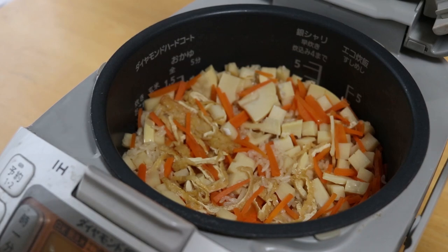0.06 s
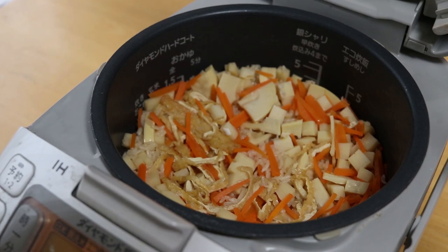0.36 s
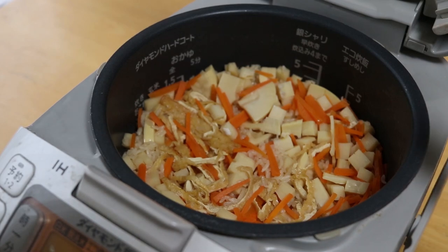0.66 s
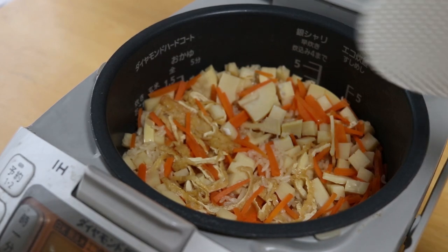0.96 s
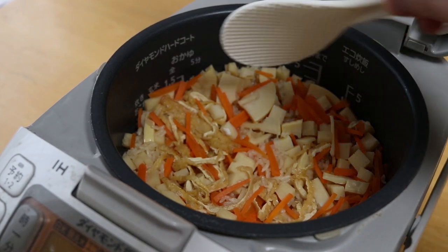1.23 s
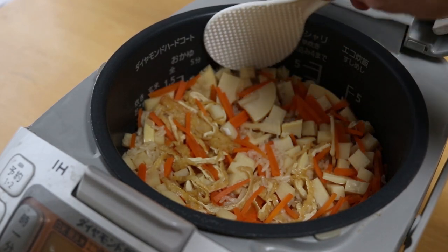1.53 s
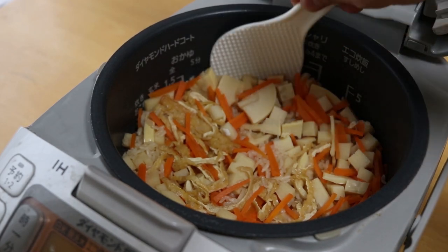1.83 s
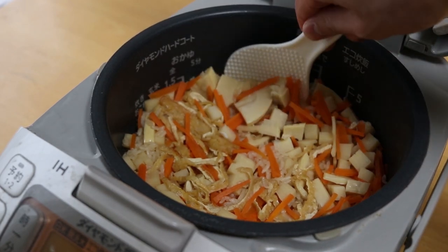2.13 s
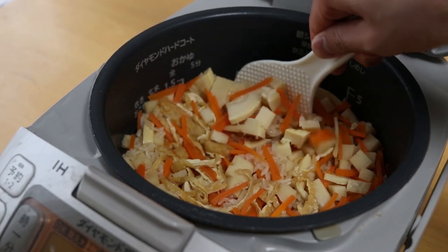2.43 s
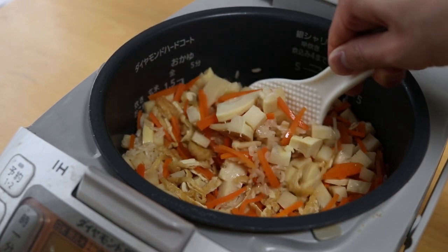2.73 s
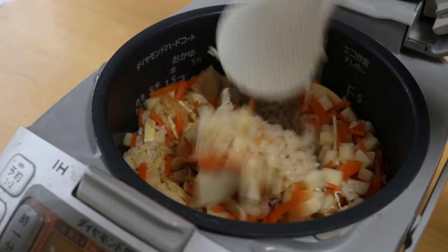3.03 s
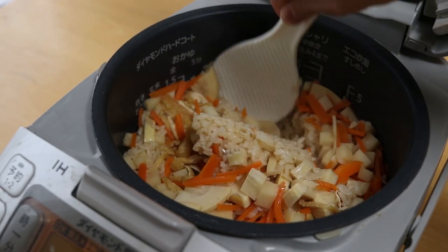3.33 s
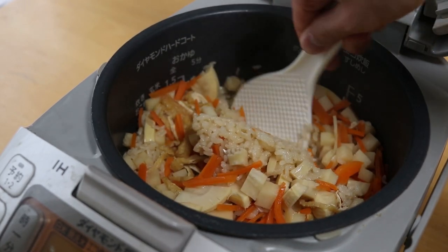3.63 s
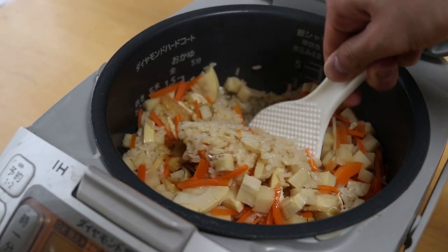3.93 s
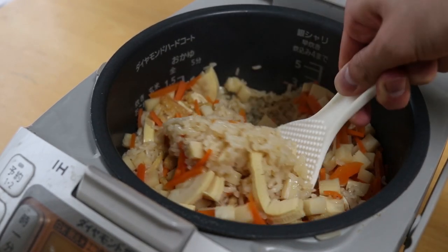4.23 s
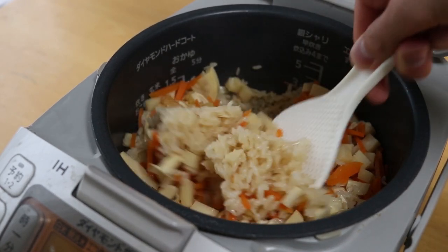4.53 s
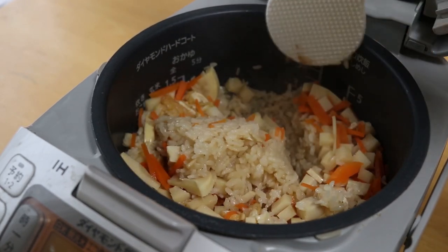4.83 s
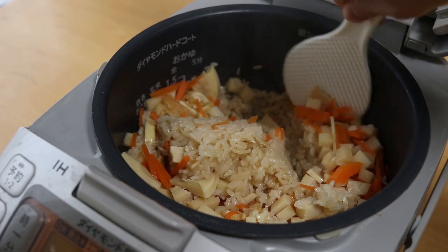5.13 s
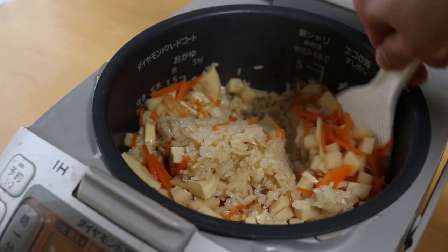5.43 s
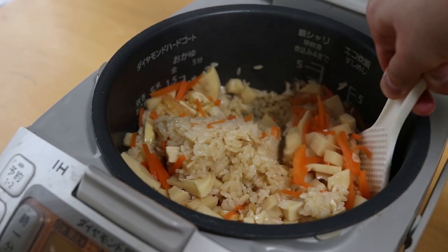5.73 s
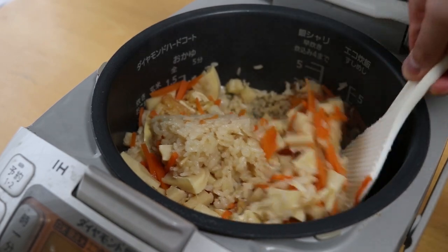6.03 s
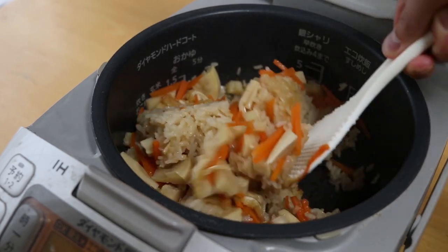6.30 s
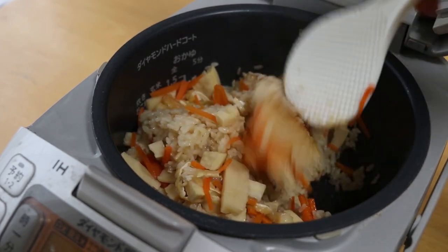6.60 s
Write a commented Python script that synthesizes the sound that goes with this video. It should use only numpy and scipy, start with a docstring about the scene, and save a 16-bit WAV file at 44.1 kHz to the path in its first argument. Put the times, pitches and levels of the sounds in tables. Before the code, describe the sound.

Moist rice squelches and crackles as a plastic paddle taps and scrapes a nonstick pot, which knocks in its housing in a quiet kitchen.

```python
"""A quiet kitchen, two microphones close to a rice cooker. At first there is room tone, a low drone
and one faint knock. From 1.6 s a plastic paddle stirs cooked rice and vegetables: it clacks and scrapes
on the nonstick pot, and between blows the sticky rice squelches and crackles. At 2.5 s and 3 s the pot
knocks hard in its housing, and with the second knock a scoopful tumbles back. The stirring goes on
through another hard knock at 5.5 s and a small tumble at 6.5 s, then ends on a soft push."""
import sys
import numpy as np
from scipy import signal
from scipy.fft import rfft, irfft, next_fast_len
from scipy.io import wavfile

SR = 44100
rng = np.random.default_rng(int(sys.argv[2]) if len(sys.argv) > 2 else 0)


def persist_wave(psi):
    """Save psi, clipped to +-1, as 16-bit WAV."""
    counts = np.round(np.clip(psi, -1, 1) * 32767).astype(np.int16)
    wavfile.write(sys.argv[1], SR, np.atleast_2d(counts).T)


N = 302513
TIME = np.arange(N) / SR
AGE = np.arange(SR // 2) / SR  # seconds since a blow


def amp(db):
    """Decibels to gain."""
    return 10 ** (np.asarray(db) / 20)


def unit(x):
    """Scales to rms 1."""
    return x / np.sqrt(np.mean(x ** 2) + 1e-20)


def unit_hit(x):
    """Scales a short sound to the energy of 10 ms at rms 1."""
    return x * np.sqrt(SR / 100 / (np.sum(x ** 2) + 1e-20))


def value_at(points, hz):
    """A curve's value at hz, on a log-frequency axis."""
    freqs, values = np.transpose(points)
    return np.interp(np.log(hz + 1), np.log(freqs + 1), values)


def add(mix, start_s, sound):
    """Mixes a sound in at start_s."""
    part = mix[max(round(start_s * SR), 0):][:len(sound)]
    part += sound[:len(part)]


def colour(x, spectrum):
    """Filters by a spectrum in dB."""
    size = next_fast_len(len(x))
    gain = amp(value_at(spectrum, np.fft.rfftfreq(size, 1 / SR)))
    return irfft(rfft(x, size) * gain, size)[:len(x)]


def band(x, lo_hz, hi_hz, order=2):
    """Causal band-pass."""
    edges_hz = [lo_hz, min(hi_hz, SR / 2 - 1000)]
    return signal.sosfilt(signal.butter(order, edges_hz, "band", fs=SR, output="sos"), x)


def ring(modes):
    """Dying sines; each blow lands elsewhere and weights them a little differently."""
    out = np.zeros(SR // 4)
    for hz, db, t60 in modes:
        t = AGE[:int(t60 * SR)]
        add(out, 0, amp(db + rng.standard_normal() - 60 * t / t60) * np.sin(2 * np.pi * hz * t))
    return unit_hit(out)


def crack(lo_hz, hi_hz, t60, after_db, after_t60):
    """Crowded, well damped modes: a sharp burst and a weaker after-ring."""
    t = AGE[:SR // 10]
    decay = amp(-60 * t / t60) + amp(after_db - 60 * t / after_t60)
    return unit_hit(band(rng.choice([-1., 1.], len(t)) * decay, lo_hz, hi_hz, order=3))


def grains(per_s, spread_db, size):
    """Random clicks, mostly small and a few large."""
    strength = amp(spread_db * np.minimum(rng.exponential(1, size), 4))
    sign = rng.choice([-1., 1.], size)
    return strength * sign * (rng.random(size) < per_s / SR)


def gesture(start_s, length_s, rise_s, release_s):
    """An envelope that rises, holds, then dies away."""
    rise = np.clip((TIME - start_s) / rise_s, 0, 1)
    return rise * np.exp(-np.maximum(TIME - start_s - length_s, 0) / release_s)


# each microphone's own noise: freq_hz, level_db
HISS_SPECTRUM = [(24, -34), (40, -2), (136, -6), (722, -6.5), (3470, -7), (12400, -2), (15500, -4)]
def microphone_hiss(level_db=-60.5):
    """Steady self-noise of one microphone."""
    return amp(level_db) * unit(colour(rng.standard_normal(N), HISS_SPECTRUM))


# the still kitchen: freq_hz, level_db
ROOM_TONE_SPECTRUM = [(12, -48), (20, -4.5), (70, 2), (106, -5.5), (145, -1), (202, -8), (226, -0.5),
                      (373, -12), (417, -6.5), (454, -18), (507, -13.5), (551, -18.5), (886, -17.5),
                      (2220, -25.5), (5000, -29), (15600, -36.5)]
# a low drone that swells and fades: time_s, level_db
DRONE_LEVELS = [(0, -63), (.4, -67), (.51, -49), (.69, -57), (.78, -51), (.89, -56), (.98, -49),
                (1.12, -69), (1.6, -66)]
def room_tone(level_db=-54):
    """Steady noise of the kitchen, with a low drone that wavers early on."""
    drone_db = np.interp(TIME, *np.transpose(DRONE_LEVELS))
    drone = amp(drone_db) * unit(band(rng.standard_normal(N), 59.5, 71))
    return amp(level_db) * unit(colour(rng.standard_normal(N), ROOM_TONE_SPECTRUM)) + drone


# decay of the kitchen's echoes: freq_hz, t60_s
ECHO_DECAY = [(100, 0.85), (260, 0.37), (700, 0.52), (1840, 0.47), (4850, 0.49), (14000, 0.085)]
# tone of those echoes at the microphones: freq_hz, level_db
ECHO_SPECTRUM = [(60, 2), (135, -3), (185, -10.5), (250, -2), (400, -11.5), (600, -11.5), (1000, -9),
                 (1400, -13.5), (2200, -15), (4000, -14.5), (6000, -17), (14000, -33.5)]
def kitchen_echoes(x, first_s=0.003):
    """Dense echoes off near walls, each band dying at its own speed."""
    echoes = grains(4000, 0.51, len(AGE)) * np.clip((AGE - first_s) / 0.0023, 0, 1)
    hz, t, bands = signal.stft(echoes, SR, nperseg=256)
    decay = amp(-60 * t / value_at(ECHO_DECAY, hz)[:, None])
    tail = signal.istft(bands * decay, SR, nperseg=256)[1]
    return signal.oaconvolve(x, colour(tail / np.linalg.norm(tail), ECHO_SPECTRUM))[:N]


# slow low resonances of cooker, table and room: pitch_hz, gain_db, width_hz
BOOM_MODES = [(76, -3, 34), (138, 6, 14), (240, 2, 15), (490, -5, 20)]
def boom(x, delay_s=0.00754):
    """Low resonances that swell after each blow and outlast it."""
    out = np.zeros(N)
    for hz, db, width_hz in BOOM_MODES:
        swell = AGE * np.exp(-np.pi * width_hz * AGE)
        response = 2 * swell / swell.sum() * np.sin(2 * np.pi * hz * AGE)
        add(out, delay_s, amp(db) * signal.oaconvolve(x, response))
    return out


# a low hum standing between table and walls: pitch_hz, level_db, t60_s
STANDING_WAVE_MODES = [(270, 0, .11), (345, -8, .08), (398, -8, .07), (475, -9, .1)]
def standing_wave_hum(rise_s=.02):
    """A low hum between table and walls takes a few cycles to build after a blow, then dies quickly."""
    out = np.zeros(N)
    swell = 1 - np.exp(-(AGE[:SR // 4] / rise_s) ** 2)
    for start_s, *_, hum_db in contacts():
        add(out, start_s, amp(hum_db) * unit_hit(ring(STANDING_WAVE_MODES) * swell))
    return out


def starch_pop(hz, t60=0.0009, rustle_share=0.73):
    """A starch film snapping: a click of a few cycles with a rustle around its pitch."""
    t = AGE[:SR // 50]
    snap = np.sin(2 * np.pi * hz * t) * amp(-60 * t / t60)
    rustle = band(rng.standard_normal(len(t)), hz / 2.6, hz * 2.5) * amp(-60 * t / 0.01)
    return unit_hit(unit_hit(snap) + rustle_share * unit_hit(rustle))


# low shove of the mass and its wet squelch, heard close: freq_hz, level_db
SHOVE_SPECTRUM = [(20, -5), (40, -23), (75, 3.5), (105, -9), (140, 1.5), (185, -10), (250, 4.5), (350, -8),
                  (490, -8), (750, -16.5), (1500, -15.5), (4000, -44)]
SQUELCH_SPECTRUM = [(200, 2), (600, 1), (1500, -6), (2300, -9), (3700, -2.5), (5000, -15), (7500, -16.5),
                    (15000, -18)]
# the paddle moves through the rice: start_s, length_s, shove_db, squelch_db, crackle_db
PADDLE_STROKES = [(1.603, 0.6, -53.5, -55.5, -59), (2.356, 0.55, -56.5, -50.5, -57),
                  (3.222, 0.19, -48, -74, -64), (3.516, 0.39, -48, -52, -61.5),
                  (4.067, 0.37, -56, -55, -60), (4.46, 0.36, -55, -74, -63),
                  (5.044, 0.12, -45.5, -53, -54.5), (5.261, 0.31, -44, -49, -53),
                  (6.08, 0.12, -47.5, -55, -55.5), (6.517, 0.18, -47, -61, -61)]
# large sticky grains letting go: start_s, level_db, pitch_hz
GRAIN_SNAPS = [(1.5548, -46.5, 4900), (1.738, -45, 6400), (2.1007, -49.5, 4170), (2.2016, -52, 5200),
               (2.6567, -44, 4150), (2.8866, -46, 11000), (4.0283, -46, 5240), (4.298, -45, 6400),
               (5.298, -43, 6200), (5.305, -45, 6400), (5.4534, -43, 5170)]
def sticky_rice(crackles_per_s=200):
    """With each stroke the paddle shoves the soft mass, which squelches while single grains unstick."""
    levels = np.zeros((3, N))
    for start_s, length_s, *layers_db in PADDLE_STROKES:
        stroke = gesture(start_s, length_s, rise_s=0.019, release_s=0.23)
        levels = np.maximum(levels, amp(layers_db)[:, None] * stroke)
    shove_gain, squelch_gain, crackle_gain = levels
    shove = shove_gain * unit(colour(grains(500, 2.6, N), SHOVE_SPECTRUM))
    squelch = squelch_gain * unit(colour(grains(3500, 6.1, N), SQUELCH_SPECTRUM))
    pitches_hz = np.geomspace(3000, 13000, 10)
    pops_per_s = crackles_per_s / len(pitches_hz)
    pops = sum(signal.oaconvolve(grains(pops_per_s, 4.1, N), starch_pop(hz))[:N] for hz in pitches_hz)
    crackle = crackle_gain * unit(pops)
    for start_s, db, hz in GRAIN_SNAPS:
        add(crackle, start_s, amp(db) * starch_pop(hz))
    return shove + squelch + crackle


# soft clumps landing: freq_hz, level_db
PATTER_SPECTRUM = [(25, -24), (45, -10), (75, -0.5), (105, -10), (138, 6), (185, 1.5), (235, 6.5),
                   (350, -4.5), (490, 2), (750, -14), (1200, -14), (2000, -23.5), (3700, -32.5),
                   (6000, -42), (15000, -50)]
# the whole cooker on its feet: pitch_hz, level_db, t60_s
THUMP_MODES = [(88, 0, 0.17), (131.6, 2.5, .12)]
# rice falls back into the pot: start_s, length_s, patter_db, thump_db
SCOOPFULS = [(2.94, .19, -25.5, -26), (6.495, 0.017, -31, -30.5)]
def tumbles(clumps_per_s=380, spread_db=1.5):
    """The mass lands with a low thump and soft clumps patter after it."""
    flow = sum(amp(patter_db) * gesture(start_s, length_s, rise_s=0.01, release_s=0.044)
               for start_s, length_s, patter_db, _ in SCOOPFULS)
    out = flow * unit(colour(grains(clumps_per_s, spread_db, N), PATTER_SPECTRUM))
    for start_s, _, _, thump_db in SCOOPFULS:
        add(out, start_s, amp(thump_db) * ring(THUMP_MODES))
    return out


# wall of the metal pot: pitch_hz, level_db, t60_s
POT_MODES = [(480, -6, .22), (600, -9, .13), (965, -1, .12), (1015, -5, .12), (1060, -2, .18),
             (1250, -16, .16), (1712, 0, .11), (1750, -8, .1), (2379, -5, .2), (2410, -8, .14),
             (2912, -11, .14), (3338, -5, .17), (3800, -9, .1), (3990, -14, .13), (4365, -9, .1),
             (4565, -17, .18), (5080, -19, .15), (5706, -19, .15), (6585, -9, .15), (6700, -12, .12),
             (7700, -18, .1), (8150, -21, .12), (9600, -23, .14), (13320, -25, .08)]
def pot_wall(hardness_db, favoured_hz, tilt=0.21, favour_db=6, favour_octaves=0.24):
    """The pot's ring: soft contacts lean to the low modes, and the place struck favours one pitch."""
    modes = []
    for hz, db, t60 in POT_MODES:
        tilt_db = tilt * hardness_db * np.log2(hz)
        place_db = favour_db * np.exp(-(np.log2(hz / favoured_hz) / favour_octaves) ** 2)
        modes.append((hz, db + tilt_db + place_db, t60))
    return ring(modes)


# rasp of the paddle's dimples: freq_hz, level_db
RASP_SPECTRUM = [(200, 6), (500, 17), (1150, -20), (1800, -0.5), (2700, 4), (3700, -1), (5200, -9.5),
                 (7000, -5.5), (11000, -12.5), (15000, -18)]
# the paddle drags on the pot: start_s, length_s, rasp_db, ring_db
PADDLE_DRAGS = [(1.578, 0.042, -39.5, -48), (1.859, 0.065, -55, -63), (2.917, 0.064, -36, -60),
                (3.231, 0.086, -39.5, -43.5), (3.615, 0.19, -48.5, -65), (5.042, 0.092, -41.5, -45.5),
                (5.107, 0.16, -52.5, -53), (5.529, 0.16, -49, -53)]
def scrapes(slips_per_s=2500):
    """Tiny slips of the dimpled paddle rasp and set the pot singing."""
    out = np.zeros(N)
    for start_s, length_s, rasp_db, ring_db in PADDLE_DRAGS:
        size = int(length_s * SR)
        slips = unit(grains(slips_per_s, 1.6, size)) * signal.windows.tukey(size, .5)
        metal = ring(POT_MODES)
        add(out, start_s, amp(rasp_db) * unit(colour(slips, RASP_SPECTRUM)))
        add(out, start_s, amp(ring_db) * signal.fftconvolve(slips, metal / np.linalg.norm(metal)))
    return out


# the paddle taps the bare wall:
# start_s, clack_db, thud_db, tick_db, tick_hz, ring_db, favoured_hz, hum_db
WALL_TAPS = [(1.5703, -18.5, -26.5, -20, 8700, -23, 1730, -34),
             (1.6302, -30.5, -33.5, -41.5, 6900, -29.5, 1750, -44),
             (2.272, -23.5, -30, -24, 5670, -31, 1750, -27.5),
             (3.228, -22.5, -26, -28, 7860, -25.5, 2380, -21.5),
             (4.911, -26, -22, -41.5, 6860, -23.5, 1060, -22)]
# the pot knocks against its housing: start_s, thud_db, thud_hz, clack_db, hardness_0_to_1
POT_KNOCKS = [(0.475, -41.5, 408, -54, .05), (2.5002, -19, 366, -20, .4), (2.508, -42, 580, -29.5, 0.75),
              (2.916, -27, 463, -26.5, 0.41), (2.935, -23, 285, -30, 0.1), (2.967, -18, 239, -34, 0.6),
              (2.978, -8.5, 495, -22.5, 1), (3.5112, -42, 920, -38, 0.5), (3.565, -23.5, 422, -40.5, 0.3),
              (3.937, -33, 504, -41.5, 0.3), (4.397, -36, 477, -51, 0.7), (5.513, -12.5, 510, -24, 0.75),
              (5.5182, -25.5, 310, -18.5, 0.5), (6.01, -19.5, 493, -46, 0.7),
              (6.499, -27.5, 332, -30.5, 0.38), (6.521, -18.5, 422, -32.5, 0)]
# pushes reach the pot through a cushion of rice: start_s, thud_db, thud_hz
CUSHIONED_PUSHES = [(2.115, -43, 312), (2.4936, -14, 490), (4.194, -44, 524), (4.473, -38.5, 307),
                    (5.1, -37.5, 435), (5.3279, -23.5, 528), (5.335, -23.5, 398), (6.1379, -30, 446),
                    (6.418, -37, 490), (6.826, -37.5, 426)]
def contacts(tap_thud_hz=421, deep_hz=980, hum_offset_db=-12, hum_growth=0.71):
    """Lists every tap, knock and push; blows deep in the pot favour the wall modes near deep_hz."""
    for start_s, clack_db, thud_db, tick_db, tick_hz, ring_db, favoured_hz, hum_db in WALL_TAPS:
        yield start_s, thud_db, tap_thud_hz, clack_db, tick_db, tick_hz, ring_db, favoured_hz, hum_db
    for start_s, thud_db, thud_hz, clack_db, hardness in POT_KNOCKS:
        tick_db = clack_db - 28.5 + 33 * hardness  # harder knocks tick louder and brighter
        tick_hz = np.interp(hardness, [0, 1], [5470, 9100])
        ring_db = clack_db - 12
        hum_db = hum_offset_db + hum_growth * thud_db
        yield start_s, thud_db, thud_hz, clack_db, tick_db, tick_hz, ring_db, deep_hz, hum_db
    for start_s, thud_db, thud_hz in CUSHIONED_PUSHES:
        clack_db, ring_db = thud_db - 24.5, thud_db - 18  # little passes the rice
        tick_db, tick_hz = thud_db - 47, 7500  # faint tick of grains
        hum_db = hum_offset_db + hum_growth * thud_db
        yield start_s, thud_db, thud_hz, clack_db, tick_db, tick_hz, ring_db, deep_hz, hum_db


# the loaded pot in its housing, the housing's panels, the plastic paddle: pitch_hz, level_db, t60_s
HOUSING_MODES = [(277.7, 8, 0.074), (354, 11, 0.05), (395, 3, 0.038), (605, 4, 0.062), (806.5, -2.5, 0.067)]
PANEL_MODES = [(811, -0.5, 0.023), (1041, -10, 0.053), (1285, 3, 0.01), (1600, -5.5, 0.007)]
PADDLE_MODES = [(2910, 4, 0.022), (3280, 11, 0.012), (3830, -1, 0.05), (4160, -10, 0.0048),
                (5010, -5, 0.0043)]
def blows(thud_t60=0.03, housing_share=0.61, panel_share=0.77, paddle_share=0.31, crack_share=0.78):
    """Close to the microphones, each blow thuds in the pot, cracks in the plastic and rings the wall."""
    out = np.zeros(N)
    cushion = 1 - np.exp(-AGE[:SR // 4] / 0.0012)  # rice softens the onset
    for start_s, thud_db, thud_hz, clack_db, tick_db, tick_hz, ring_db, favoured_hz, _ in contacts():
        panel_db = thud_db + 0.66 * (clack_db - thud_db) - 1  # panels follow clack more than thud
        body = ring([(thud_hz, 0, thud_t60)]) + housing_share * ring(HOUSING_MODES)
        thud = unit_hit(band(body * cushion, 164, 6000, order=1))  # a small pot radiates little bass
        panel_crack = crack_share * crack(810, 1854, t60=0.01, after_db=-7, after_t60=0.084)
        clack = crack_share * crack(2140, 4080, t60=0.0064, after_db=-12.5, after_t60=0.053)
        tick = crack(tick_hz / 1.45, tick_hz * 1.17, t60=0.012, after_db=-16, after_t60=0.032)
        # the housing panels are pushed the other way, so their ring starts opposite to paddle and pot
        paddle = paddle_share * ring(PADDLE_MODES)
        panels = -panel_share * ring(PANEL_MODES)
        wall = pot_wall(tick_db - panel_db, favoured_hz)
        # hard contact on bare metal splashes the wall's crowded top modes, more so for a bright tick
        splash = crack(10000, 15000, t60=0.01, after_db=-20, after_t60=0.092)
        splash_db = (ring_db + tick_db) / 2 + 26 * np.log2(tick_hz / 9100) - 5.5
        for db, sound in [(thud_db, thud), (panel_db, panel_crack), (clack_db, clack), (tick_db, tick),
                          (clack_db, paddle), (panel_db, panels), (ring_db, wall), (splash_db, splash)]:
            add(out, start_s, amp(db) * sound)
    return out


def scene(boom_db=-5, room_db=-1):
    """Both microphones hear the same close cooker and the kitchen behind it; each adds its own hiss."""
    impacts = blows() + tumbles()
    direct = impacts + scrapes() + sticky_rice()
    resonance = standing_wave_hum() + amp(boom_db) * boom(impacts)
    mono = direct + resonance + amp(room_db) * kitchen_echoes(direct) + room_tone()
    return np.array([mono + microphone_hiss() for _ in range(2)])


def record(dry, cutoff_hz=15900):
    """The hardest blows overload the microphone input; a steep low-pass then trims the top."""
    low_pass = signal.firwin(401, cutoff_hz, window=("kaiser", 8), fs=SR)
    return signal.oaconvolve(np.clip(dry, -1, 1), low_pass[None], "same")


dry = scene()
out = record(dry)
persist_wave(out)
```